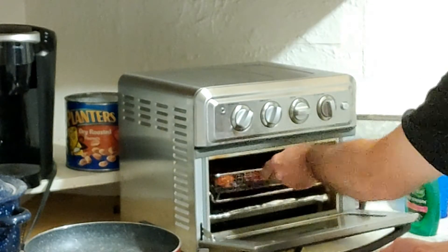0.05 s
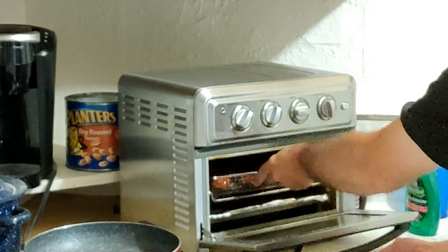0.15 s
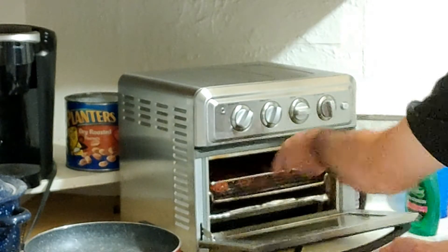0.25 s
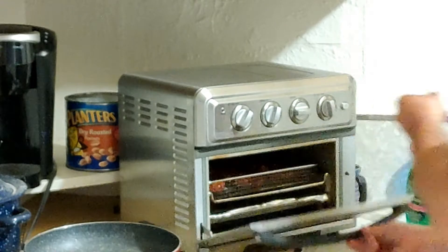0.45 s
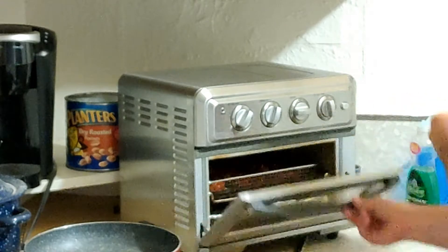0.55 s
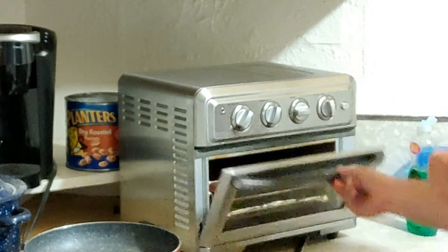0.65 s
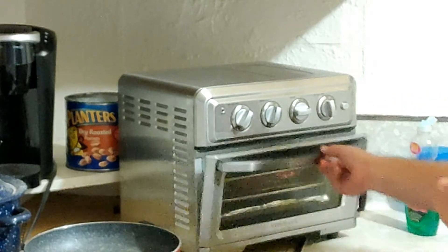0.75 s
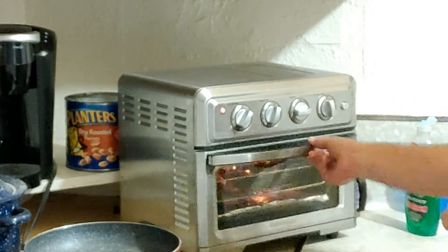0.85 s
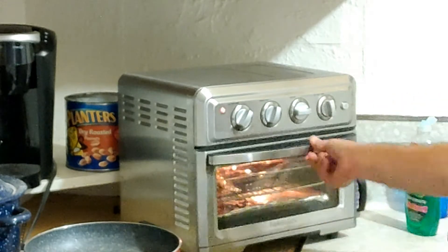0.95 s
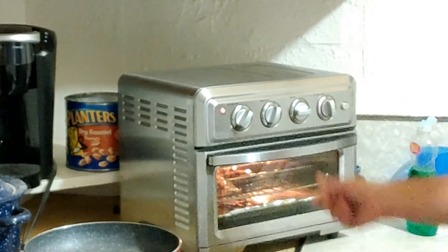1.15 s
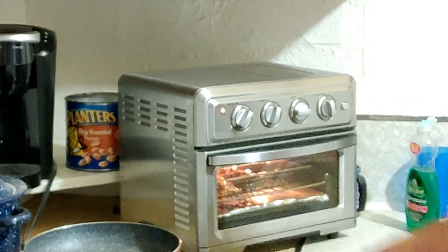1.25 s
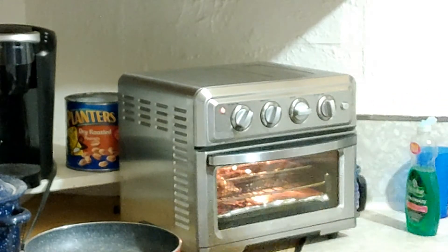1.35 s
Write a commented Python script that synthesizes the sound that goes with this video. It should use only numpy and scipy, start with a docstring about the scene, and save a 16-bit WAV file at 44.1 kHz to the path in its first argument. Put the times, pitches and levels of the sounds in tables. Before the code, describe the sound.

A wire rack clatters into a small steel oven from the start, hitting the back with a bright, ringing knock at about 0.3 seconds. Food sizzles faintly, fading as the door swings up. The hinge clicks near 0.6 seconds and moving air rumbles softly on the microphone. Just after 0.9 seconds the door shuts with a sharp metallic clunk, leaving a brief echo and a low kitchen hum.

```python
"""A wire rack clatters into a small steel oven with a tray of sizzling food and knocks against its stop.
The door swings up, shutting in the sizzle and pushing air over the microphone, then catches and slams
with a thud of the case. Each hit is a crack, a burst of fading noise and a few ringing tones.
The sizzle is thousands of tiny pops of hot fat over a hiss.
A small kitchen with a low hum echoes briefly after each blow."""
import sys
import numpy as np
from scipy import signal
from scipy.fft import rfft, irfft
from scipy.io import wavfile
from scipy.ndimage import uniform_filter1d

SR = 44100
rng = np.random.default_rng(int(sys.argv[2]) if len(sys.argv) > 2 else 0)


def transcribe(signal):
    """Save signal, clipped to [-1, 1], as a 16-bit WAV file at the path in sys.argv[1]."""
    frames = np.atleast_2d(signal).T
    limited = np.clip(frames, -1, 1)
    pcm = np.round(limited * 32767).astype(np.int16)
    wavfile.write(sys.argv[1], SR, pcm)


N = 61739


def rack():
    """The wire rack and its tray clatter along the rails."""
    # each contact: start_s, level_db, bass_db, treble_db, build_up_s, ring_db
    hits = [(0.0, -45.5, 9.5, 1.5, 0.0021, -3.5), (.136, -64, -4, 14, 0.0029, -5),
            (.1655, -41, -22, -6.5, 0.00061, 0), (.1775, -35, -1, -5, 0.00036, -0.5),
            (.182, -36.5, -26, 0.5, 0.0011, 6), (.188, -35, 7, -0.5, 0.00033, -9),
            (.202, -34.5, 11.5, 1, 0.006, -6), (.2722, -32.5, 5.5, 2, 0.00082, 2),
            (.2768, -34.5, -13, 4.5, 0.0011, -1), (.284, -36, 8, -6, 0.00092, -38),
            (.299, -44.5, 16, 4.5, 0.0017, 0), (.323, -40, -19, -1, 0.0011, -30),
            (.3405, -47.5, 11, 6.5, 0.00055, -3.5), (.358, -47, 10, -8, 0.0016, -7),
            (.418, -53, -11, 5.5, 0.0022, -2)]
    # ringing tones of rack and tray: pitch_hz, level_db, fade_s
    tones = [(182.8, -11.5, 0.52), (448, 3, 0.066), (638.5, -12.5, 0.36), (853, -9, 0.11),
             (877, -5.5, 0.14), (1030, -6.5, 0.33), (1231, -22, 0.43), (1454, -30, 0.28), (1498, -22, 0.46),
             (1614, -13, .16), (2157, -20, 0.11), (2456, -28, 0.069), (2611, -13, 0.14), (3330, -26, 0.18)]
    # clatter of the wires: pitch_hz, level_db
    spectrum = [(100, -26), (180, -7.5), (450, -3.5), (650, 3.5), (950, 2), (1350, 1), (2200, -2.5),
                (3500, -7.5), (6000, -14.5), (10000, -19), (16000, -36)]
    return blows(hits, tones, spectrum, fade_s=0.23, treble_fade_s=0.17, crack_db=2, treble_hz=2850)


def back_wall():
    """The rack strikes the steel back wall, which rings brightly."""
    # the strike: start_s, level_db, bass_db, treble_db, build_up_s, ring_db
    hits = [(.2765, -30.5, -18, 0.5, 0.00091, -7.5)]
    # ringing tones of the wall: pitch_hz, level_db, fade_s
    tones = [(2180, 3.5, 0.11), (2570, -13, 0.073), (2597, -3.5, 0.31), (3010, -14, 0.066),
             (4300, -7, 0.24)]
    # clatter of the wall: pitch_hz, level_db
    spectrum = [(400, -40), (1400, -3), (2300, 4), (3200, -4.5), (5000, -13), (7000, -12), (11000, -16),
                (16000, -22)]
    return blows(hits, tones, spectrum, fade_s=0.15, treble_fade_s=0.14, crack_db=10)


def tray():
    """The thin tray bends and booms; the deepest bass is lost as air slips round it."""
    # each bend: start_s, level_db
    bends = [(0.0, -35), (.182, -29), (.2025, -33.5), (.2135, -23.5), (.2335, -40.5)]
    # booming tones: pitch_hz, level_db, fade_s
    tones = [(206, 0.5, .16), (256, -7.5, 0.12), (295.4, -5, 0.14), (349.7, -2, 0.17), (382, -18.5, 0.36)]
    bass_cut = signal.butter(2, 194, "high", fs=SR, output="sos")
    return signal.sosfilt(bass_cut, signal.sosfilt(bass_cut, knocks(bends, tones)))


def door_slam():
    """The door meets its catch, then the frame, and the whole case thuds."""
    # each contact: start_s, level_db, bass_db, treble_db, build_up_s, ring_db
    hits = [(.9165, -33.5, -8, 7, 0.0006, -6), (.9328, -27, -4.5, 5, .0003, -1),
            (.940, -31, -7, -2, 0.00062, -2.5), (.951, -48, 0, -13, 0.00069, -12),
            (.968, -42.5, 20.5, 0, 0.0023, -7)]
    # ringing tones of door and case: pitch_hz, level_db, fade_s
    tones = [(296, -6.5, 0.45), (376, 0, 0.12), (504, -36, 0.24), (601, -14.5, .22), (709, -20.5, 0.39),
             (972.6, -9, 0.11), (1128, -5, 0.1), (1730, -7, 0.12), (1994, -9.5, 0.069), (2370, -27, 0.16)]
    # clatter of the door: pitch_hz, level_db
    spectrum = [(60, -5), (120, 3), (330, 3), (500, -0.5), (1000, 6.5), (1500, -8), (2500, -9.5),
                (4000, -14), (6500, -13), (10000, -19.5), (16000, -30)]
    # jolts of the case: start_s, level_db
    thuds = [(.932, -38.5), (.9425, -29.5)]
    # low tones of the case: pitch_hz, level_db, fade_s
    case_tones = [(86.6, -8, .16), (102.4, 4, 0.15), (131, -0.5, 0.28), (206, -3.5, 0.058),
                  (260, -3, 0.088), (343, 0.5, 0.34)]
    slam = blows(hits, tones, spectrum, fade_s=0.18, treble_fade_s=0.15, crack_db=-6)
    return slam + knocks(thuds, case_tones)


def hinge():
    """The hinge, catch and case give small clicks, and the hinge spring pings."""
    # each click: start_s, level_db, bass_db, treble_db, build_up_s, ring_db
    hits = [(.595, -45.5, 6, -6.5, 0.0028, -33), (.727, -72, 4, 19.5, .002, -20),
            (.802, -66.5, 0, 7.5, 0.0023, -14), (.8942, -37, 7, -3, 0.0008, 1.5),
            (1.360, -57.5, 1, -5.5, 0.00085, -20)]
    # ringing tones of the clicks: pitch_hz, level_db, fade_s
    tones = [(709, 2.5, 0.055), (785, 1, 0.056), (2763, -5, .06), (4370, 2.5, 0.022), (6200, -8, 0.064)]
    # noise of the clicks: pitch_hz, level_db
    spectrum = [(150, -8), (750, -1.5), (1500, -3.5), (3000, -4.5), (5700, -4.5), (10000, -8), (16000, -19)]
    # ping of the spring: start_s, level_db
    pings = [(.595, -48)]
    # high tones of the spring: pitch_hz, level_db, fade_s
    spring_tones = [(2110, -11, 0.037), (5400, -1, 0.022), (5800, -1.5, 0.034), (5970, -4, 0.026)]
    clicks = blows(hits, tones, spectrum, fade_s=0.15, treble_fade_s=0.15, crack_db=-20)
    return clicks + knocks(pings, spring_tones)


def sizzle():
    """Hot fat makes tiny pops and a hiss, fading as the door closes."""
    # loudness through the door opening: time_s, level_db
    loudness = [(0, -67), (.12, -71), (.3, -53.5), (.45, -56.5), (.57, -60), (.68, -65.5), (.8, -70.5),
                (.88, -72), (.98, -90)]
    # bright sound of the fat: pitch_hz, level_db
    spectrum = [(500, -16), (1500, -3), (4000, -3.5), (9000, -0.5), (12000, -4), (16000, -8)]
    pops_per_s = 3800
    pops = (rng.random(N) < pops_per_s / SR) * rng.standard_normal(N)
    hiss = rng.standard_normal(N)
    return unit(colour(unit(pops) + hiss, spectrum)) * curve(loudness)


def rubbing():
    """The sliding rack and the swinging door rub with a dull noise."""
    # loudness of the rubbing: time_s, level_db
    loudness = [(0, -52.5), (.12, -53.5), (.3, -42.5), (.42, -44), (.5, -53), (.58, -55.5), (.64, -46.5),
                (.73, -47.5), (.82, -50.5), (.9, -52), (1.1, -53), (1.4, -60)]
    # its dull sound: pitch_hz, level_db
    spectrum = [(80, 3.5), (180, 4.5), (400, 2), (550, -3), (800, -7), (1300, -15.5), (2500, -24),
                (8000, -41)]
    return noise(spectrum) * curve(loudness)


def moving_air():
    """Arm and door push air over the microphone in deep puffs."""
    # each puff: peak_s, level_db, half_length_s
    puffs = [(0.246, -35, 0.025), (0.318, -27, 0.021), (0.453, -28, 0.039), (0.524, -20, 0.015),
             (0.572, -17, 0.021), (0.646, -14, 0.024), (0.731, -14.5, 0.022), (0.813, -16.5, 0.013),
             (0.87, -20, 0.019), (0.908, -21.5, 0.029), (0.992, -30.5, 0.047), (1.098, -30, 0.029)]
    # rumble of the air: pitch_hz, level_db
    spectrum = [(5, -4), (12, 0), (18, -2), (25, -10), (40, -15), (50, -24), (62, -35), (80, -47),
                (110, -60), (250, -80), (1000, -110)]
    t = np.arange(N) / SR
    swells = sum(undb(db) * np.exp(-.5 * ((t - peak_s) / half_s) ** 2) for peak_s, db, half_s in puffs)
    return steady(noise(spectrum), span_s=0.082) * (undb(-49.5) + swells)


def kitchen_echo(sound):
    """The counter and walls add a short, blurred echo to a sound."""
    delay_s, echo_db = 0.006, -12
    tail = at(delay_s, die_away(rng.standard_normal(N), fade_s=0.3, treble_fade_s=0.32))
    tail /= np.sqrt(np.sum(tail ** 2))
    return sound + undb(echo_db) * signal.fftconvolve(sound, tail)[:N]


def background():
    """Quiet room noise and the faint hum of an appliance."""
    # room noise: pitch_hz, level_db
    spectrum = [(30, 5), (70, 5.5), (120, -11.5), (200, 1.5), (320, -0.5), (500, -7.5), (800, -12),
                (1200, -18.5), (2000, -24), (3200, -31.5), (6000, -36.5), (10000, -41), (16000, -64)]
    # humming tones: pitch_hz, level_db
    tones = [(113, -59), (167, -66), (296, -57.5)]
    t = np.arange(N) / SR
    hum = sum(undb(db) * np.sqrt(2) * np.sin(2 * np.pi * (hz * t + rng.random())) for hz, db in tones)
    return undb(-53) * noise(spectrum) + hum


def blows(hits, tones, spectrum, fade_s, treble_fade_s, crack_db, treble_hz=8600):
    """Each hard hit on steel gives a crack, a noisy clatter and ringing tones."""
    bass_hz, middle_hz, crack_s = 250, 1150, 0.0005
    t = np.arange(N) / SR
    steel = steel_peaks()
    total = np.zeros(N)
    for start_s, level_db, bass_db, treble_db, build_up_s, ring_db in hits:
        balance = [(bass_hz, bass_db), (middle_hz, 0), (treble_hz, treble_db)]
        metal_noise = irfft(rfft(noise(spectrum)) * steel, N)
        metal_noise = colour(steady(metal_noise, span_s=0.0051), balance)
        crack = undb(crack_db) * metal_noise * np.exp(-t / crack_s)
        clatter = die_away(metal_noise, fade_s, treble_fade_s)
        ringing = undb(ring_db) * ring(tones, balance)
        rise = 1 - np.exp(-t / build_up_s)
        total += at(start_s, undb(level_db) * rise * (crack + clatter + ringing))
    return total


def knocks(pushes, tones):
    """Soft pushes make an object ring without any clatter."""
    ringing = ring(tones)
    return sum(at(start_s, undb(db) * ringing) for start_s, db in pushes)


def ring(tones, balance=((100, 0), (1000, 0))):
    """A struck object's own tones, each fading at its own speed."""
    t = np.arange(N) / SR
    return sum(undb(db) * gain_at(hz, balance) * np.sin(2 * np.pi * hz * t) * fade(fade_s)
               for hz, db, fade_s in tones)


def steel_peaks():
    """Thin steel favours many high pitches: random small peaks and dips in its treble."""
    ripple_db, width_hz, full_depth_hz = 2.5, 52, 9700
    depth_db = ripple_db * np.minimum(np.fft.rfftfreq(N, 1 / SR) / full_depth_hz, 1)
    ripple = uniform_filter1d(rng.standard_normal(N // 2 + 1), int(width_hz * N / SR))
    return undb(depth_db * unit(ripple))


def undb(db):
    """Turn decibels into a gain, the number to multiply a sound by."""
    return 10 ** (np.asarray(db) / 20)


def unit(x):
    """Scale to an average (rms) level of 1."""
    return x / np.sqrt(np.mean(x ** 2))


def curve(points):
    """Gain over time from (time_s, level_db) points."""
    return undb(np.interp(np.arange(N) / SR, *np.array(points).T))


def gain_at(hz, spectrum):
    """Gain at the given pitches from (pitch_hz, level_db) points."""
    pitch_hz, level_db = np.array(spectrum).T
    return undb(np.interp(np.log(np.maximum(hz, 1)), np.log(pitch_hz), level_db))


def colour(x, spectrum):
    """Turn each pitch in a sound up or down to follow a spectrum."""
    return irfft(rfft(x) * gain_at(np.fft.rfftfreq(N, 1 / SR), spectrum), N)


def noise(spectrum):
    """Noise with the given spectrum and an average level of 1."""
    return unit(colour(rng.standard_normal(N), spectrum))


def steady(x, span_s):
    """Even out the chance swells of a noise."""
    power = np.abs(uniform_filter1d(x ** 2, int(span_s * SR)))
    return x / np.sqrt(power + 1e-12)


def fade(fade_s):
    """A gain that falls by 60 dB in fade_s seconds."""
    return np.exp(-np.log(1000) * np.arange(N) / SR / fade_s)


def die_away(x, fade_s, treble_fade_s):
    """Let the lows and the treble of a noise fade at their own speeds."""
    low = signal.sosfiltfilt(signal.butter(2, 3000, fs=SR, output="sos"), x)
    return low * fade(fade_s) + (x - low) * fade(treble_fade_s)


def at(start_s, x):
    """Start a sound at the given time."""
    return np.concatenate([np.zeros(int(start_s * SR)), x])[:N]


def scene():
    """Rack, door and sizzle in the kitchen, with moving air on the microphone."""
    rub = rubbing()
    oven = rack() + back_wall() + tray() + hinge() + door_slam()
    return (kitchen_echo(oven) + sizzle() + rub + moving_air() + background())[None]


def record(dry):
    """The recorder cuts the highest treble."""
    top_hz = 15850
    return signal.sosfilt(signal.ellip(10, .2, 80, top_hz, fs=SR, output="sos"), dry)


dry = scene()
out = record(dry)
transcribe(out)
```